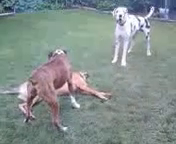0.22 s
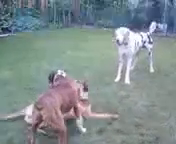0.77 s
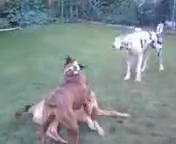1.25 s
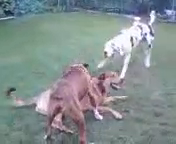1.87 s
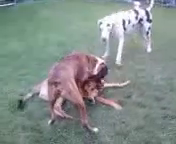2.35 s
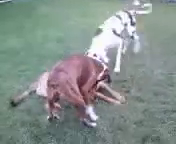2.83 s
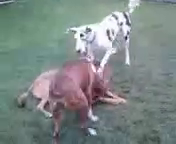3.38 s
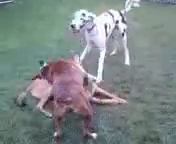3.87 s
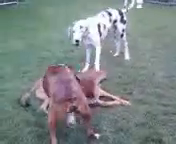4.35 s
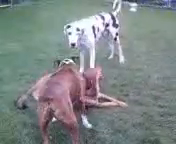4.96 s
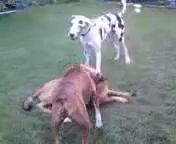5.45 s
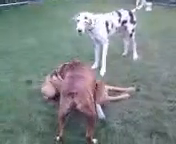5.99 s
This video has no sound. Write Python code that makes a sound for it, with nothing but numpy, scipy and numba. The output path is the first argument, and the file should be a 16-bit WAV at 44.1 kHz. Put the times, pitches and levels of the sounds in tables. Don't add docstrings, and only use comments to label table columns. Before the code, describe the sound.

Quiet grainy hiss and faint grass rustles open the scene, then a big dog barks twice, loud and hoarse. A playing dog growls and snarls briefly, much softer than the barks, over a low ground rumble. Four further single barks follow at fairly regular intervals, the last ending abruptly. The yard returns short echoes; the phone microphone distorts on every bark and hiss swells after it.

```python
import sys
import numpy as np
from scipy import signal
from scipy.fft import rfft, irfft, next_fast_len
from scipy.io import wavfile
from scipy.ndimage import uniform_filter1d, map_coordinates
from numba import njit

SR = 44100
rng = np.random.default_rng(int(sys.argv[2]) if len(sys.argv) > 2 else 0)


def gain_from_decibels(decibels):
    exponent = np.asarray(decibels, float) / 20
    return 10 ** exponent


def dump(signal):
    limited = np.clip(np.atleast_2d(signal).T, -1, 1)
    pcm = np.round(limited * 32767).astype(np.int16)
    wavfile.write(sys.argv[1], SR, pcm)


N = 274734

# start_s, rise_s, hold_s (after the start), release_db_per_s, peak_db
BARK_EFFORTS = [
    (1.051, .012, 0.15, 200, -7.5),
    (1.625, .016, .15, 311, -8),
    (3.584, 0.028, 0.18, 503.5, -7.5),
    (4.341, 0.035, 0.17, 373.5, -6.5),
    (5.04, 0.023, 0.15, 394, -7.5),
    (5.688, .013, 0.16, 703.5, -8.5),
]
# time_s, pitch_hz, halving (0-1), roughness (0-1)
BARK_FOLDS = [(1.05, 390, .8, .55), (1.095, 440, .6, .45), (1.12, 458, .2, .18), (1.17, 452, .25, .22),
              (1.2, 420, .4, .45), (1.24, 394, .05, .12), (1.28, 375, .1, .2), (1.63, 430, .8, .5),
              (1.7, 448, .55, .42), (1.79, 405, .4, .35), (1.84, 380, .3, .4), (3.6, 400, .6, .5),
              (3.66, 385, .8, .4), (3.7, 370, .85, .14), (3.76, 372, .75, .14), (3.81, 360, .3, .35),
              (4.36, 385, .15, .18), (4.42, 435, .6, .3), (4.445, 408, .8, .25), (4.52, 440, .85, .3),
              (4.57, 400, .3, .35), (5.05, 360, .75, .45), (5.115, 340, .85, .18), (5.175, 338, .85, .2),
              (5.21, 405, .3, .3), (5.26, 395, .2, .35), (5.7, 500, .9, .3), (5.765, 420, .6, .4),
              (5.83, 480, .4, .35), (5.89, 410, .3, .4)]
# throat_early_hz, throat_late_hz, mouth_early_hz, mouth_late_hz, mouth_db
BARK_TRACTS = [(905, 810, 1120, 1100, -7), (840, 815, 1070, 1280, -8.5), (947, 890, 1170, 1185, -4.5),
               (803, 915, 1320, 900, 1.5), (828, 900, 1190, 1100, 0), (856, 850, 1130, 1090, 1.5)]
# full_hz, empty_hz, half_sunk (share of the bark), level_db
BARK_CHESTS = [(560, 420, .68, -19.5), (540, 280, 0.82, -21.5), (520, 330, .5, -13.5),
               (530, 440, .9, -17.5), (540, 450, 0.32, -13.5), (540, 450, 0.67, -12)]
# centre_hz, width_hz
BARK_FIXED = [(1950, 130), (2800, 520)]
# time_s, level_db, mouth_opening (0-1)
GROWL_EFFORTS = [
    [(2.05, -76.5, .5), (2.17, -70.5, 0.9), (2.31, -54, 0.4), (2.42, -48, 0), (2.54, -48, 0),
     (2.6, -52, 0.62)],
    [(2.59, -35.5, 0), (2.648, -28.5, 0.83), (2.67, -21.5, 0.69), (2.795, -19, 0.46), (2.825, -36, 0.2),
     (2.87, -38, 0), (2.9, -48.5, 0)],
    [(2.9, -54.5, 0), (2.96, -34, 0.01), (2.988, -48, 0.4), (3.008, -34, 0.05), (3.052, -41.5, .2),
     (3.12, -74, 0.6)],
    [(3.36, -83.5, 0.38), (3.44, -55.5, 0.46), (3.484, -64, 0), (3.534, -50.5, .1), (3.564, -53, .4),
     (3.595, -42.5, .3)],
    [(3.98, -71, .6), (4.014, -62, 0.8), (4.045, -60.5, 1.05), (4.108, -59.5, 0.8), (4.14, -78.5, 0)],
]
# time_s, pitch_hz, halving (0-1), roughness (0-1)
GROWL_FOLDS = [(2.052, 81.94, 0, 0.67), (2.55, 110.1, 0, 0.64), (2.611, 142.9, 0, 0.09),
               (2.656, 217.3, 0.3, .25), (2.71, 235.7, 0.1, 0.4), (2.781, 221, 0.4, .28),
               (2.831, 212.7, 0.6, 0.37), (2.904, 131, 0, 0.38), (3.126, 108.1, 0.5, 0.5),
               (3.332, 60.85, 0.9, 0), (3.5, 104.4, 0.1, 0.31), (3.618, 124, 0.1, 0.08),
               (4.001, 119.2, .1, 0.41)]
# centre_hz, width_hz
GROWL_FIXED = [(1490, 133), (2050, 290)]
# frequency_hz, t60_s
YARD_DECAY = [(200, 0.17), (500, 0.77), (900, 0.72), (1500, 0.42), (2500, 0.13), (4000, 0.21)]
# delay_s, level_db
WALL_ECHOES = [(0.052, -8), (0.139, -28), (.17, -39), (0.304, -51.5)]
# frequency_hz, gain_db
ECHO_COLOUR = [(150, 6), (300, 3.5), (500, -5), (850, -8), (1100, -0.5), (1500, 6), (2200, 3.5),
               (3500, -6.5)]
# start_s, peak_db, centre_hz
PAW_RUSTLES = [(0.309, -64, 1070), (0.419, -48.5, 2280), (0.619, -47, 2660), (0.683, -58, 700),
               (0.739, -48.5, 527), (0.969, -62, 530), (1.444, -35.5, 800), (2.009, -53, 944),
               (2.407, -40.5, 563), (2.853, -39, 670), (3.405, -43, 721), (4.179, -65.5, 505),
               (5.493, -35.5, 805), (6.199, -42, 2380)]
# frequency_hz, density_db (per hz)
RUMBLE_SPECTRUM = [(12, -34), (20, -6.5), (27, -3.5), (65, -5.5), (300, -23.5), (390, -53), (660, -120)]
# frequency_hz, density_db (per hz)
HISS_SPECTRUM = [(120, -42.5), (200, -14.5), (356, 2), (400, -2), (511, -5), (686, -3.5), (1350, -7),
                 (2930, -4.5), (4300, -23.5), (5590, -62), (9460, -120)]
# frequency_hz, gain_db
SPEECH_BAND = [(20, -1.5), (200, 5.5), (3300, -5), (3700, -6), (4050, -10), (4300, -60), (4800, -100)]


def barks():
    out = np.zeros(N)
    teeth, palate = BARK_FIXED
    for effort, tract, chest in zip(BARK_EFFORTS, BARK_TRACTS, BARK_CHESTS):
        start_s, rise_s, hold_s, release, peak_db = effort
        throat_early_hz, throat_late_hz, mouth_early_hz, mouth_late_hz, open_db = tract
        full_hz, empty_hz, half_sunk, low_db = chest
        start = round(start_s * SR)
        t = np.arange(round((hold_s + 25.5 / release) * SR)) / SR
        n = len(t)
        late = t / t[-1]

        db = peak_db - 49.5 * np.exp(-t / rise_s) - 14 * (t / hold_s - .6) ** 2
        db -= release * np.clip(t - hold_s, 0, None)
        below_peak_db = peak_db - db

        throat_hz = throat_early_hz + (throat_late_hz - throat_early_hz) * late
        mouth_hz = mouth_early_hz + (mouth_late_hz - mouth_early_hz) * late
        chest_hz = full_hz + (empty_hz - full_hz) / (1 + np.exp((half_sunk - late) / .08))
        chest_db = low_db + 0.66 * below_peak_db
        mouth_db = open_db - 2.2 * np.clip(5.0 - below_peak_db, 0, None) + 5 * late ** 3

        source = folds(BARK_FOLDS, start, n, jitter=.17, scatter_db=5, breath=1.91)
        windpipe_air = unit(uniform_filter1d(rng.standard_normal(SR)[:n], size=9))
        turbulence = np.clip((db + 30.0) / 9, 0, 1.5) * windpipe_air
        lung_push = formant(rng.standard_normal(SR)[:n], 225.9, 410)

        chest_ring = formant(formant(source + turbulence, chest_hz, 260), chest_hz, 260)
        mouth_ring = formant(source + 0.99 * turbulence, mouth_hz, 470)
        mouth_ring += gain_from_decibels(-21.5) * formant(source, *teeth)
        voice = formant(source, throat_hz, 340) + gain_from_decibels(chest_db) * chest_ring
        voice += gain_from_decibels(mouth_db) * mouth_ring
        voice += gain_from_decibels(-20.5 + 1.2 * (db + 3.5)) * formant(source, *palate)
        voice += gain_from_decibels(-35.5 + below_peak_db) * lung_push
        drive_db = 1.044 * np.clip(db + 13, 0, None)
        out[start:start + n] += gain_from_decibels(db + drive_db) * fade(n, 0.022) * voice
    return out


def growls():
    out = np.zeros(N)
    teeth, palate = GROWL_FIXED
    fold_s, pitch_hz = np.transpose(GROWL_FOLDS)[:2]
    for rows in GROWL_EFFORTS:
        start, (db, opening) = columns(rows)
        n = len(db)
        throat_hz = 300 + (443 - 300) * opening ** 0.48
        mouth_hz = 781.5 + (1100 - 781.5) * opening ** 3.5
        mouth_db = -16 + (11 + 16) * opening ** 1.7
        teeth_db = -25.5 + (6.6 + 25.5) * opening ** .8
        chest_db = -3 - 0.72 * (db + 46.5) - 13 * (opening - .3)
        chest_hz = 1.2 * np.interp((start + np.arange(n)) / SR, fold_s, pitch_hz)

        source = folds(GROWL_FOLDS, start, n, jitter=0.2014, scatter_db=6, breath=3.2)
        voice = formant(source, throat_hz, 180) + gain_from_decibels(chest_db) * formant(source, chest_hz, 79)
        voice += gain_from_decibels(mouth_db) * formant(source, mouth_hz, 350)
        voice += gain_from_decibels(teeth_db) * (formant(source, *teeth) + gain_from_decibels(-10) * formant(source, *palate))
        out[start:start + n] += gain_from_decibels(db) * fade(n, 0.017) * voice
    return out


def folds(table, start, n, jitter, scatter_db, breath):
    s, *cols = np.transpose(table)
    t = (start + np.arange(n)) / SR
    pitch_hz, halving, rough = [np.interp(t, s, c) for c in cols]
    cycle = np.cumsum(pitch_hz * (1 + jitter * rough * wobble(SR, 120)[:n])) / SR
    whole = cycle.astype(int)
    phase = cycle % 1
    size = gain_from_decibels(scatter_db * rough * rng.standard_normal(2000)[whole])
    size = size * (1 - np.clip(halving, 0, 1) * (whole % 2))
    closing = np.exp(-phase * 24)
    pulses = size * (closing - closing.mean())
    air = uniform_filter1d(rng.standard_normal(SR)[:n], size=9)
    air = air * (1.2 + size * np.exp(-phase * 3))
    return unit(pulses) + breath * rough * unit(air)


def formant(x, hz, width_hz):
    centre = hz + np.zeros(len(x))
    once = resonate(x, centre, width_hz, SR)
    return unit(resonate(once, centre, width_hz, SR))


@njit
def resonate(x, hz, width_hz, rate):
    y = np.zeros(len(x))
    r = np.exp(-np.pi * width_hz / rate)
    for i in range(2, len(x)):
        turn = 2 * np.pi * hz[i] / rate
        y[i] = x[i] - x[i - 2] + 2 * r * np.cos(turn) * y[i - 1] - r * r * y[i - 2]
    return y


def columns(rows):
    s, *cols = np.transpose(rows)
    first, end = round(s[0] * SR), round(s[-1] * SR)
    t = np.arange(first, end) / SR
    return first, [np.interp(t, s, c) for c in cols]


def fade(n, s):
    t = np.arange(n) / SR
    return np.clip(np.minimum(t, t[::-1]) / s, 0, 1)


def yard(x, wet_db, rise_s):
    out, hop = np.zeros(N + 2 * SR), SR // 2
    for start in range(0, N, hop):
        hz, t, z = signal.stft(rng.standard_normal(SR), SR, nperseg=256)
        decay = gain_from_decibels(-60 * t / along(YARD_DECAY, hz)[:, None])
        tail = signal.istft(z * decay, SR, nperseg=256)[1][:SR]
        t = np.arange(len(tail)) / SR
        tail = gain_from_decibels(wet_db) * tail / np.linalg.norm(tail) * (1 - np.exp(-t / rise_s))
        slap = sum(gain_from_decibels(db - 32.5) * np.exp(-((t - s) / 0.004) ** 2) for s, db in WALL_ECHOES)
        response = tail + slap * rng.standard_normal(len(t))
        wet = signal.fftconvolve(x[start:start + hop], response)
        out[start:start + len(wet)] += wet
    return out[:N]


def rustles():
    out, t = np.zeros(N + SR), np.arange(SR // 10) / SR
    for s, db, hz in PAW_RUSTLES:
        puff = formant(rng.standard_normal(len(t)), hz, 750)
        envelope = t / 0.0055 * np.exp(1 - t / 0.0047)
        out[round(s * SR):][:len(t)] += gain_from_decibels(db - 6.5) * envelope * puff
    return out[:N]


def rumble(wrestling):
    level = gain_from_decibels(-57) + gain_from_decibels(-34.5) * lingering(wrestling, 0.05)
    return level * patchy(RUMBLE_SPECTRUM, patchy_db=3.0, flutter_db=-0.5)


def hiss(dogs):
    level = gain_from_decibels(-67 + 5) + gain_from_decibels(-45) * lingering(dogs, 0.19)
    return level * patchy(HISS_SPECTRUM, patchy_db=2.9, flutter_db=1)


def patchy(spectrum, patchy_db, flutter_db):
    z = signal.stft(rng.standard_normal(N + 512), nperseg=256)[2]
    field = uniform_filter1d(rng.standard_normal(z.shape), size=4, axis=0)
    field = uniform_filter1d(field, size=6, axis=1)
    noise = signal.istft(z * gain_from_decibels(patchy_db * unit(field)), nperseg=256)[1][:N]
    coloured = filtered(noise, lambda hz: gain_from_decibels(along(spectrum, hz)))
    return unit(gain_from_decibels(flutter_db * wobble(N, 30)) * coloured)


def lingering(x, s):
    keep = np.exp(-1 / (s * SR))
    return signal.lfilter([1 - keep], [1, -keep], np.sqrt(np.abs(x)))


def filtered(x, response):
    m = next_fast_len(len(x) + 8192)
    return irfft(rfft(x, m) * response(np.fft.rfftfreq(m, 1 / SR)), m)[:len(x)]


def along(points, hz):
    f, v = np.transpose(points)
    return np.interp(np.log(hz + 1), np.log(f + 1), v)


def wobble(n, rate):
    knots = rng.standard_normal(int(n * rate / SR) + 4)
    return map_coordinates(knots, [np.arange(n) * rate / SR])


def unit(x):
    return x / np.sqrt(np.mean(x ** 2) + 1e-20)


def scene():
    barking, wrestling = barks(), growls()
    dogs = barking + wrestling
    echoes = filtered(yard(dogs, wet_db=-23.5, rise_s=0.069), lambda hz: gain_from_decibels(along(ECHO_COLOUR, hz)))
    waver = .00025 * SR * wobble(N, 130)
    echoes = map_coordinates(echoes, [np.arange(N) + waver])
    return (dogs + echoes + rustles() + rumble(wrestling) + hiss(dogs))[None]


def roll_off(x):
    return signal.sosfilt(signal.butter(12, 15760, fs=SR, output="sos"), x)


def record(dry):
    x = 1.758 * np.tanh(dry[0] / 1.65)
    x = filtered(x, lambda hz: gain_from_decibels(along(SPEECH_BAND, hz)))
    x = np.clip(x, -.71, .71)
    mix = x[None] - .002
    return roll_off(mix)


dry = scene()
out = record(dry)
dump(out)
```